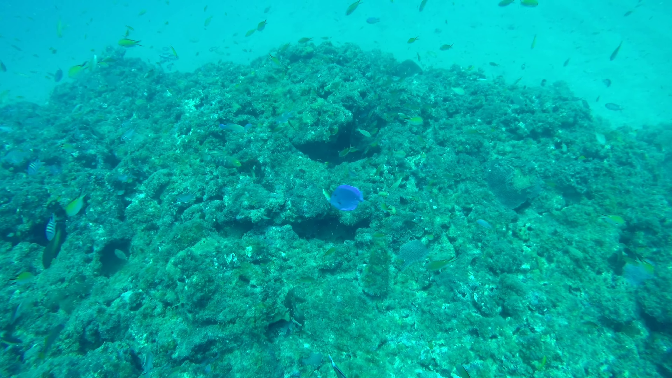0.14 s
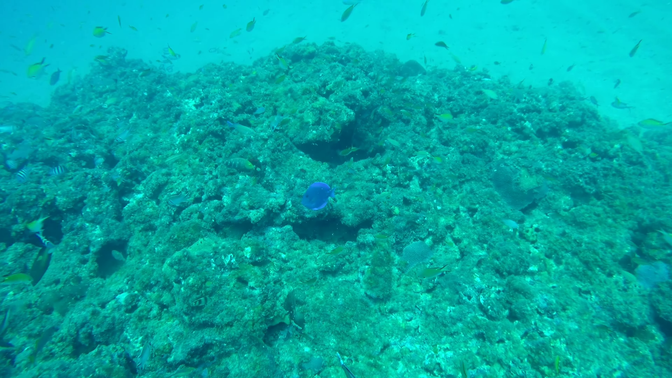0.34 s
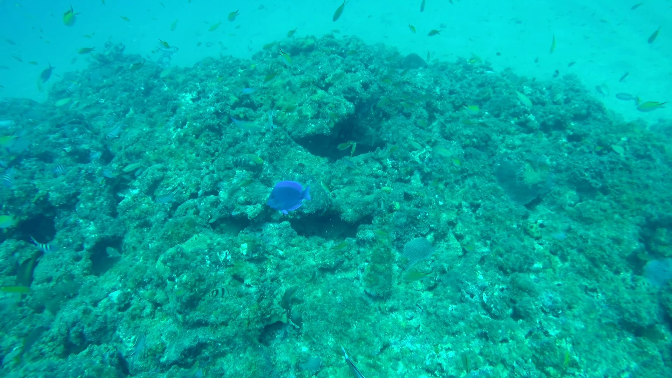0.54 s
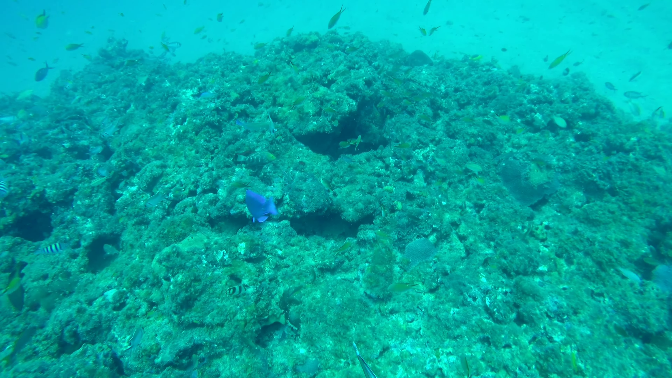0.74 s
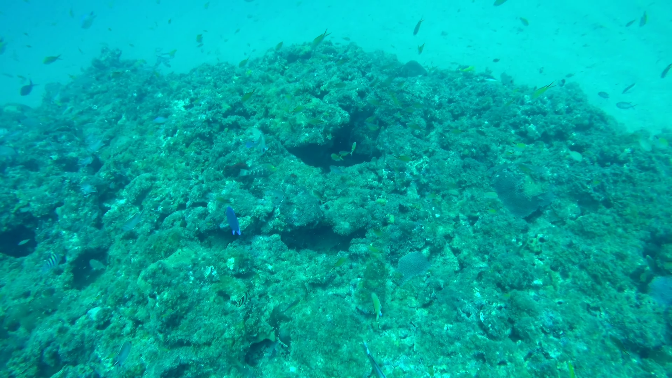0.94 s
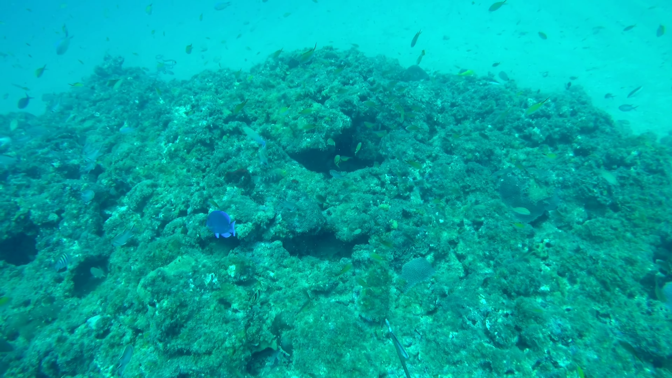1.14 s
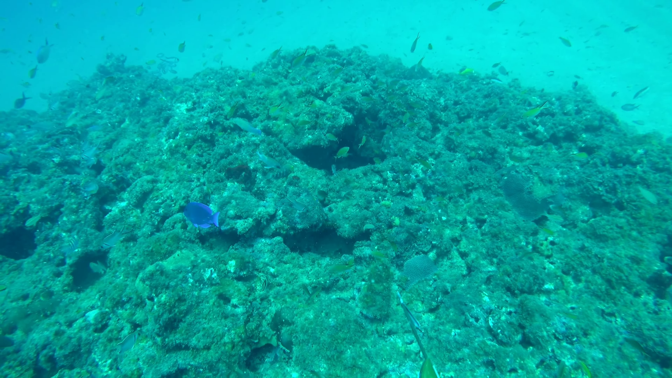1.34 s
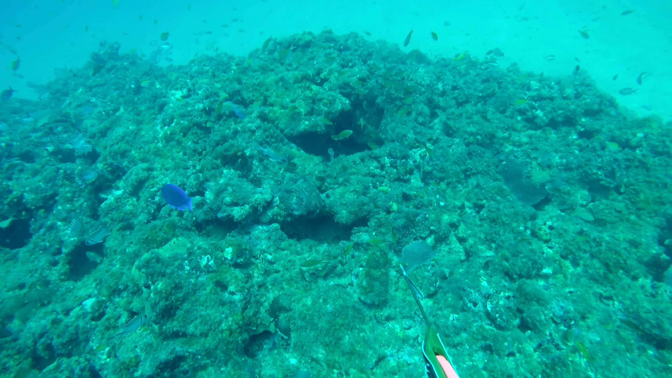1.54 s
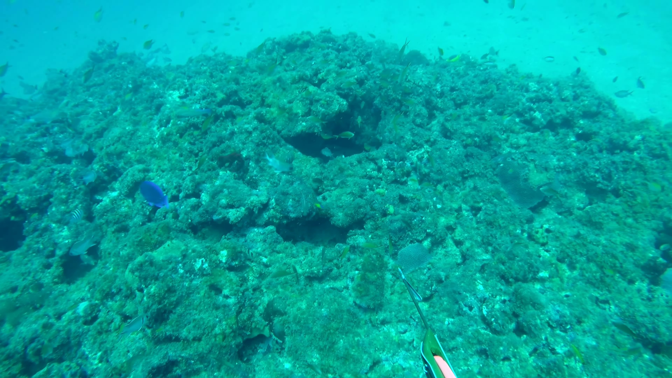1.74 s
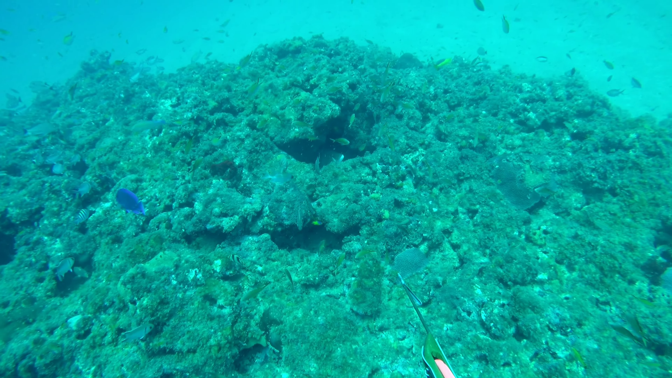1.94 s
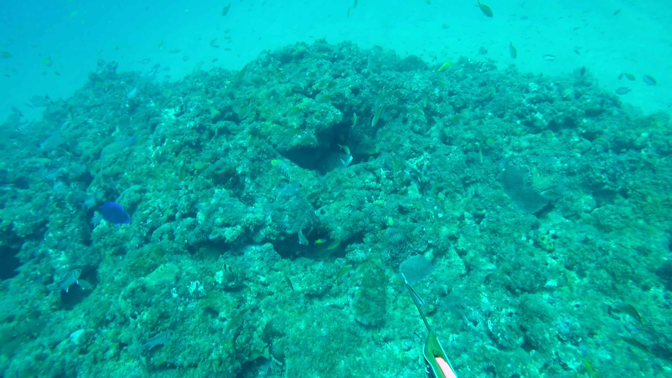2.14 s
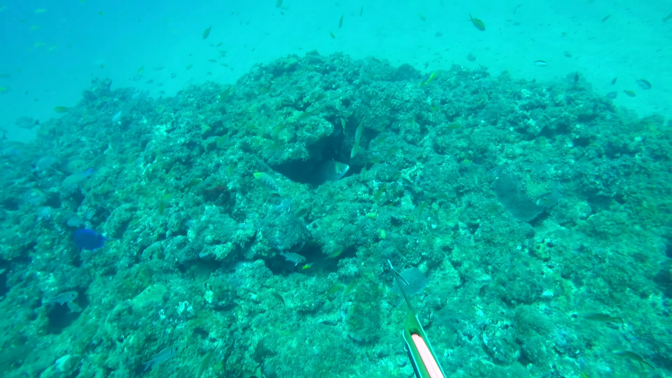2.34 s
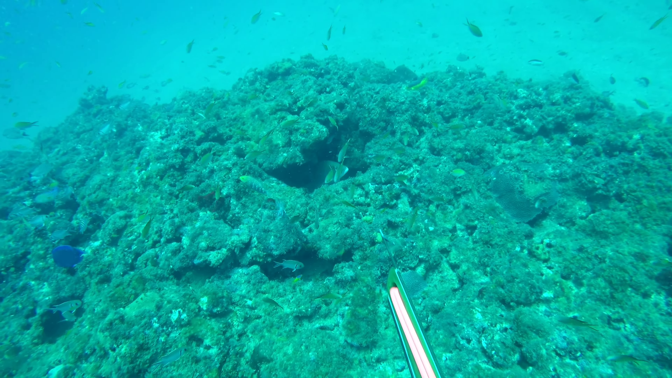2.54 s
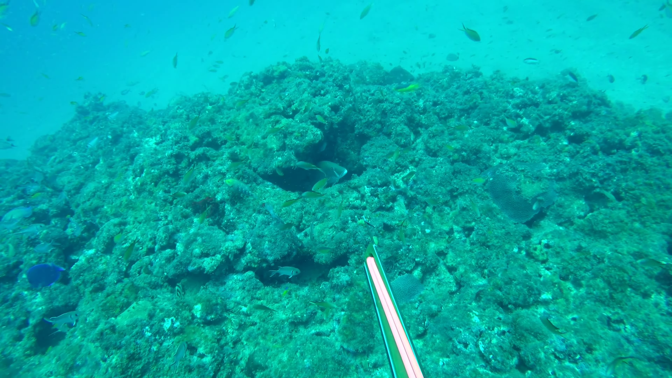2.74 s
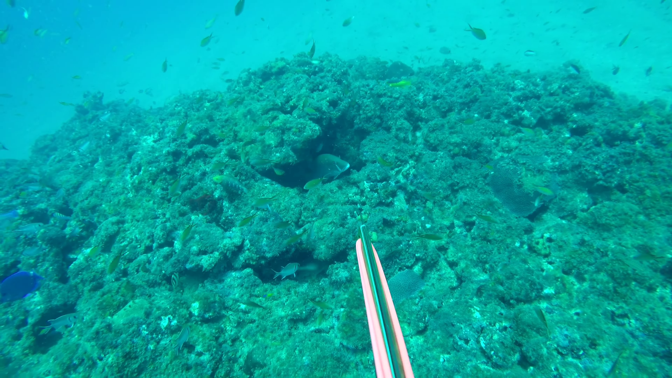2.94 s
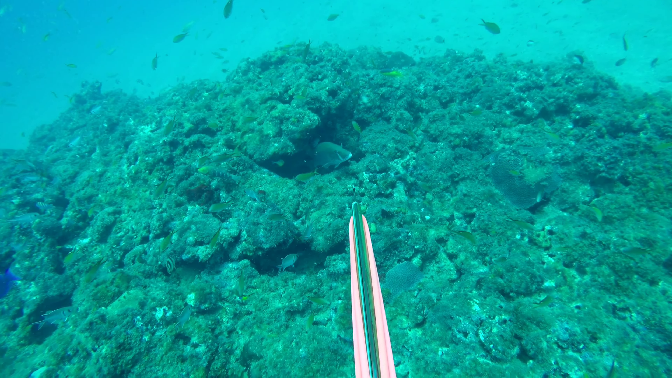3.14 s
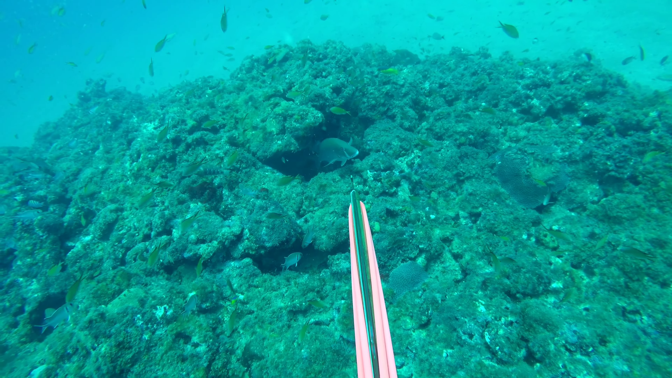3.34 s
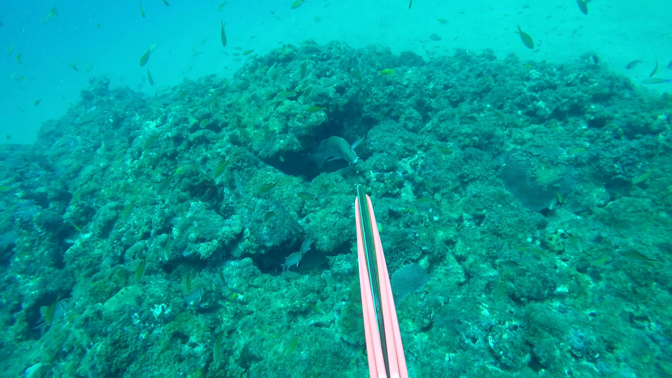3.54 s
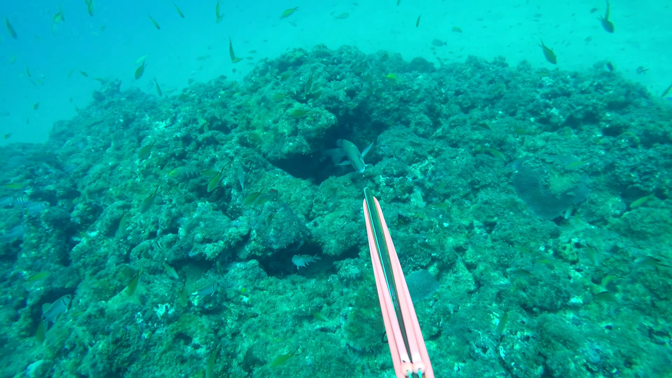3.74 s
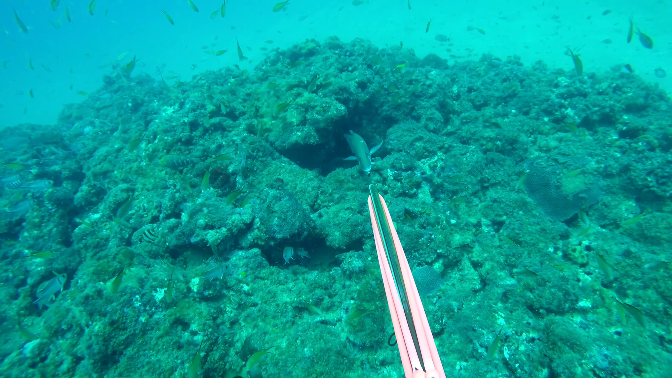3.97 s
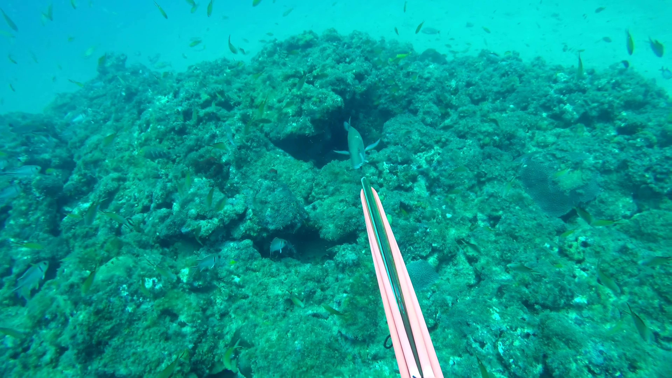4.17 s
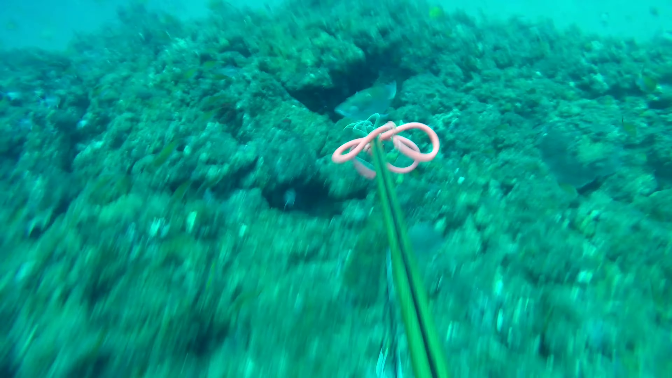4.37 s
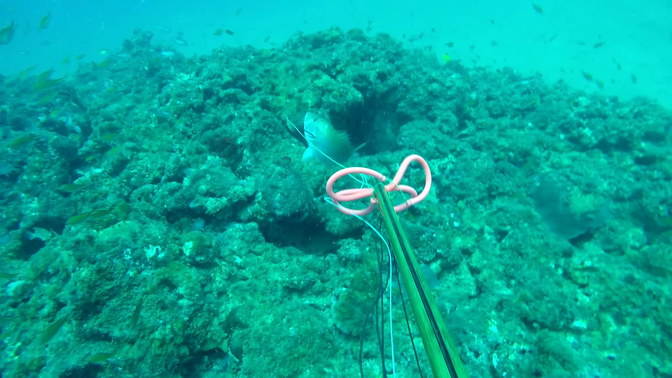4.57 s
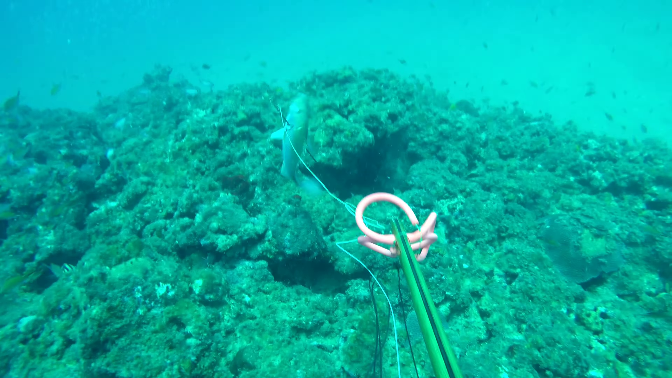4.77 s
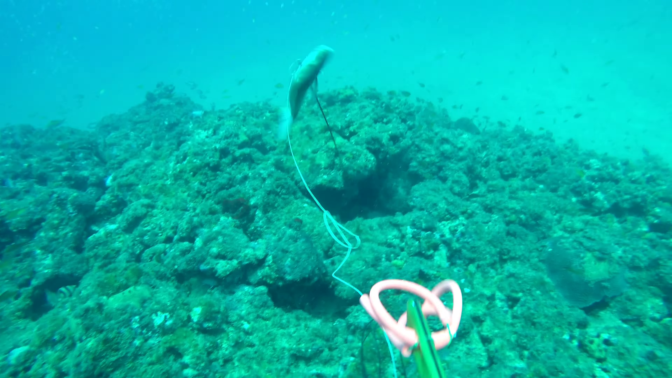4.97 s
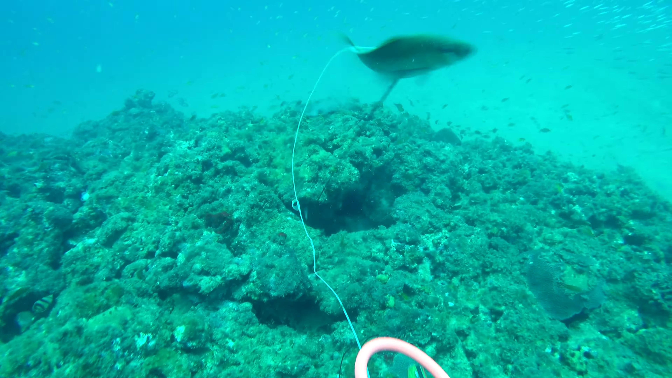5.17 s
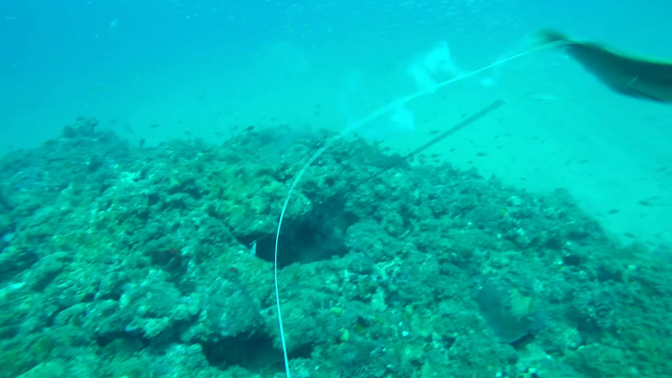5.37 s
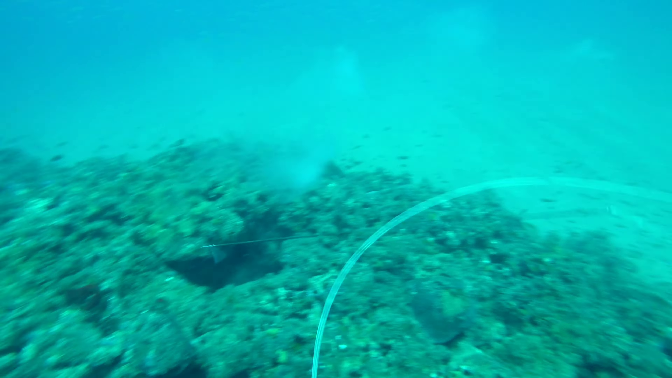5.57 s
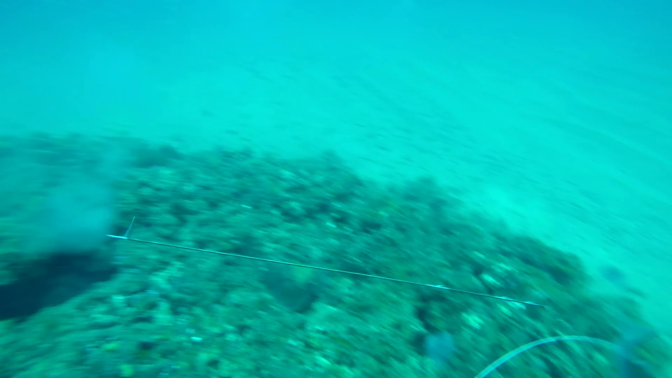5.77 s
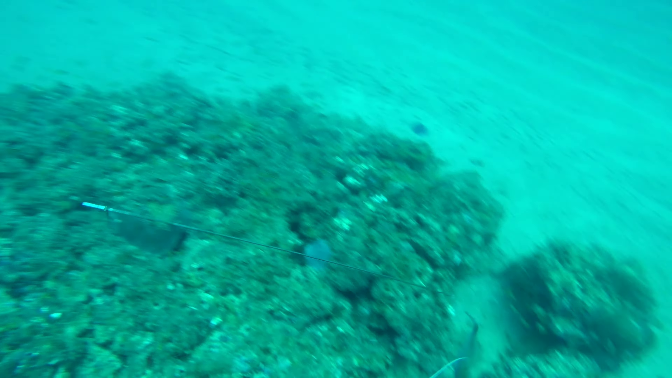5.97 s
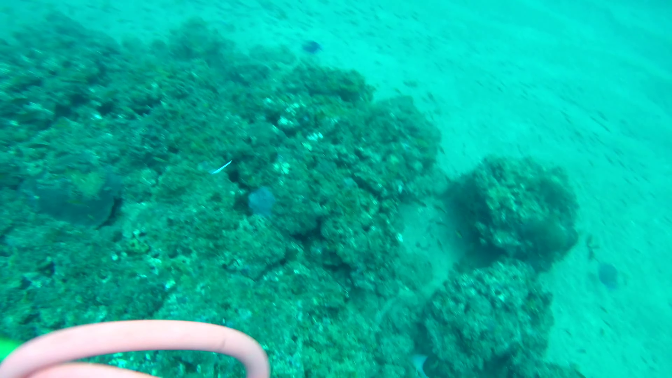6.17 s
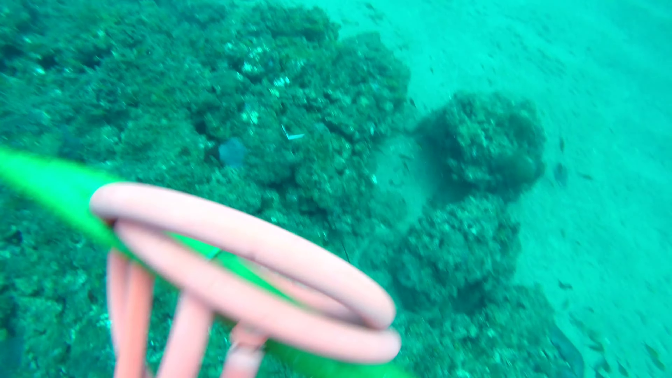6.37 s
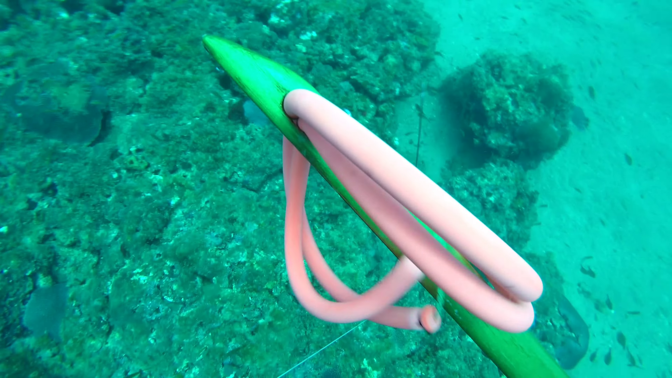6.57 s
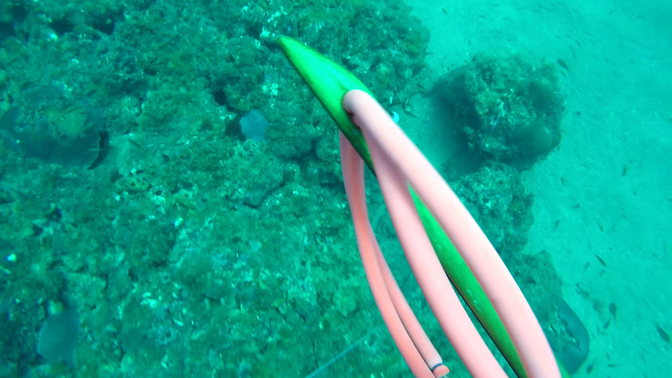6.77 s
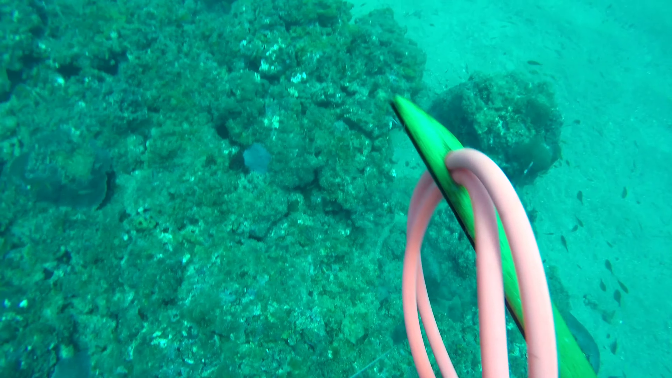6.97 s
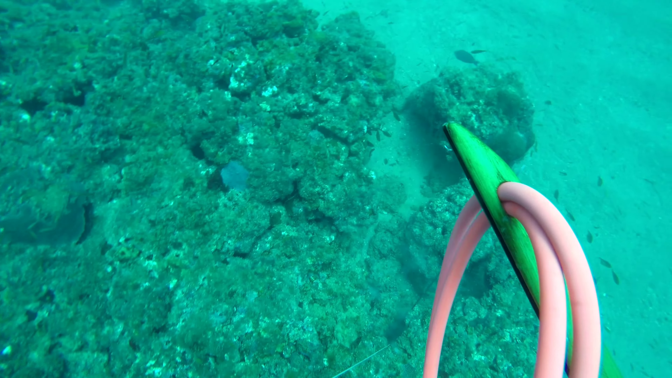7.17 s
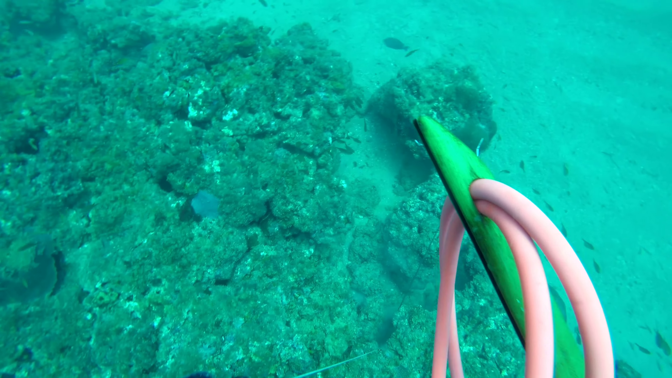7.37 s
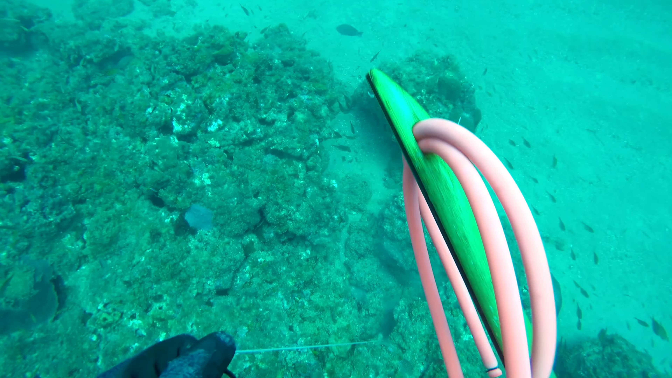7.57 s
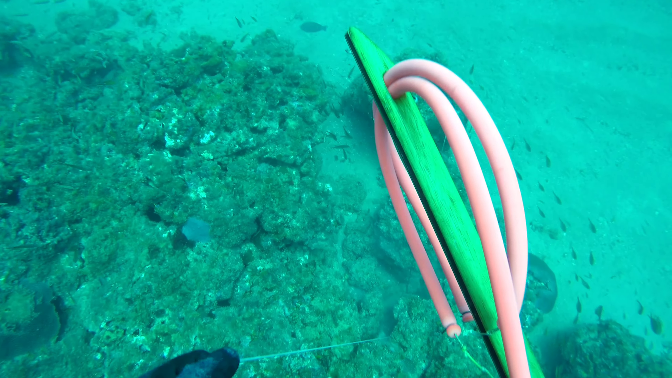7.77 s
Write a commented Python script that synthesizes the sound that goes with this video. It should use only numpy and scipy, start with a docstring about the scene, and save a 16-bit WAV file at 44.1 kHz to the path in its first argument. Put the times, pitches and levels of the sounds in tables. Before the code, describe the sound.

Quiet submerged hiss and steady ticking are broken by a loud speargun shot, followed by gurgling water, rubber rubs, clunks and small bubbles.

```python
"""Over a reef, from a cased camera on a diver's head: crackling water hiss, low surge and a steady
far ticking, likely a boat engine, with dull thumps of the case and a few near shrimp snaps.
Past four seconds a band-powered speargun fires close by and bubbles hiss; gun, rubber bands and line
knock, ping and rub while water rumbles past the case, and later the gear lets go of bubbles.
Ticks and hiss ring in the modes of the plastic case, knocks and rubbing in those of the gun."""
import sys
import numpy as np
from scipy import signal
from scipy.io import wavfile

SR = 44100
rng = np.random.default_rng(int(sys.argv[2]) if len(sys.argv) > 2 else 0)


def pcm_store(signal):
    """Save signal as 16-bit PCM."""
    levels = np.round(np.clip(np.atleast_2d(signal), -1, 1) * 32767)
    wavfile.write(sys.argv[1], SR, levels.astype(np.int16).T)


N = 344414  # length [samples]


def amp(db):
    """Decibels to gain."""
    return 10 ** (np.asarray(db) / 20)


def rms_one(x):
    """Scale to unit rms."""
    return x / np.sqrt(np.mean(x ** 2) + 1e-20)


def butter(x, hz, kind, order=2):
    """Butterworth filter."""
    return signal.sosfilt(signal.butter(order, hz, kind, fs=SR, output="sos"), x)


def drift(hz):
    """Random wander of unit rms, slower than hz."""
    return rms_one(butter(rng.standard_normal(N + SR), hz, "low")[SR:])


def add(out, s, sound):
    """Mix a short sound in at time s."""
    at = max(round(s * SR), 0)
    out[at:at + len(sound)] += sound[:N - at]


def burst(t60, rise_s):
    """A puff of noise that swells quickly and dies away."""
    t = np.arange(round(.12 * SR)) / SR
    swell = 1 - np.exp(-t / rise_s)
    return rng.standard_normal(len(t)) * swell * amp(-60 * t / max(t60, .004))


def grains(per_s, spread_db):
    """Random clicks of very uneven size; rms 1."""
    sizes = amp(spread_db * np.minimum(rng.exponential(1, N), 4)) * rng.choice([-1, 1], N)
    return rms_one(sizes * (rng.random(N) < per_s / SR))


def modes(x, table, spread_db=0):
    """Parallel two-pole resonances, their gains scattered at random by spread_db."""
    out = 0
    for hz, width, db in table:
        r = np.exp(-np.pi * width / SR)
        gain = amp(db + spread_db * rng.standard_normal()) * (1 - r * r) / 2
        poles = [1, -2 * r * np.cos(2 * np.pi * hz / SR), r * r]
        out = out + signal.lfilter([gain, 0, -gain], poles, x + 1e-18)
    return out


def in_time(rows, t):
    """Columns of a curve, read at times t."""
    s, *columns = np.transpose(rows)
    return [np.interp(t, s, c) for c in columns]


# modes of the plastic case round the microphone: (frequency [Hz], width [Hz], relative level [dB])
CASE_MODES = [(717, 33, 3.5), (935, 262, 7.5), (1210, 43, 5.5), (1828, 235, 7), (2500, 290, -5),
              (3370, 450, 2), (4470, 190, -23.5), (6470, 730, -27.5)]
# dead spots between the modes: (frequency [Hz], width [Hz])
CASE_DEAD_SPOTS = [(1570, 93), (2950, 610), (4200, 110)]


def case(x):
    """Waterborne sound rings in the case modes, then thins at the dead spots between them."""
    out = modes(x, CASE_MODES)
    for hz, width in CASE_DEAD_SPOTS:
        # part of the sound passes each dead spot untouched
        out = 0.24 * out + 0.72 * signal.lfilter(*signal.iirnotch(hz, hz / width, SR), out)
    return out


def reef_hiss():
    """The reef crackles finely, in clumps: a mass of tiny clicks heard through the case."""
    hiss_db = -59 + 2.8 * drift(25)
    crackle = butter(grains(3000, 5.25), 1327, "low", order=1)
    return amp(hiss_db) * rms_one(case(crackle))


def self_noise():
    """The microphone's own steady noise, with a faint narrow hiss high up."""
    noise = butter(butter(rng.standard_normal(N), 170, "high"), 2370, "low", order=1)
    high_hiss = butter(rng.standard_normal(N), [10800, 11300], "band")
    return amp(-64) * rms_one(noise) + amp(-82.5) * rms_one(high_hiss)


# water stirred by the diver's moves, at the case: (time [s], relative level [dB])
MOTION = [(0, -54.5), (.38, -89), (.43, -51), (.59, -48), (.7, -67.5), (4.22, -74), (4.27, -27),
          (4.46, -39.5), (4.6, -44), (4.85, -40), (5.15, -33.5), (5.45, -38.5), (5.8, -46.5), (5.88, -39),
          (6.2, -40), (6.4, -33), (6.9, -41.5), (7.26, -41.5), (7.32, -52.5), (7.45, -43), (7.81, -54.5)]


def stirred_water_db():
    """Level of the stirred water, following the diver's moves."""
    motion_db, = in_time(MOTION, np.arange(N) / SR)
    return motion_db


def surge(motion_db):
    """Low pressure swings push the membrane directly, in calm water and more while moving."""
    calm_db, moving_over_motion_db = -50.5, 2
    swings = butter(butter(rng.standard_normal(N), 36.0, "low"), 14, "high")
    swings = rms_one(swings) * amp(2.0 * drift(20.0))
    return swings * np.hypot(amp(calm_db), amp(motion_db + moving_over_motion_db))


def gurgle():
    """Trapped water slops: random pushes dealt to low rings of ten cycles; rms 1."""
    pushes, dealt, out = grains(300, 4.87), rng.integers(0, 10, N), 0
    for k, hz in enumerate(np.geomspace(80, 330, 10)):
        r, w = amp(-60 * hz / 10.0 / SR), 2 * np.pi * hz / SR
        push = pushes * (dealt == k) + 1e-18
        out = out + signal.lfilter([np.sin(w)], [1, -2 * r * np.cos(w), r * r], push)
    low = butter(out, 285, "low", order=6) + 0.057 * butter(out, 770, "low")
    return rms_one(butter(low, 140, "high"))


def rumble(motion_db):
    """Gurgling water pushes the membrane directly, as strongly as the diver stirs it."""
    return gurgle() * amp(motion_db + 3.04 * drift(20.0))


def bubble_wash(motion_db):
    """Fine bubbles in the stirred water wash against the case as a mass of small clicks."""
    clicks = rms_one(butter(grains(600, 4.14), [300, 1000], "band"))
    wash_over_motion_db = -16.5
    return clicks * amp(motion_db + wash_over_motion_db + 3.5 * drift(20))


# the far engine hunts around its mean speed:
# (time [s], lag behind the even beat [ms], relative level [dB])
ENGINE = [(0, 5.5, -36.5), (0.55, -2, -36), (0.96, 4.5, -35.5), (1.3, -2.5, -37), (1.71, -5, -39),
          (1.96, 5, -36), (2.36, -3.5, -40), (2.46, 2, -36.5), (2.79, 5, -35.5), (3.2, -3, -35),
          (3.53, -9, -36), (3.83, 7.5, -36), (3.97, 11.5, -37.5), (4.2, -6.5, -42), (5.2, 5.5, -49.5),
          (5.75, 6.5, -32.5), (6.15, 6, -48), (7.81, 11.5, -40)]
# its cylinders in firing order: (relative level [dB])
CYLINDERS = [-10.5, -1, -2, -3.5]
FIRINGS_PER_S, FIRST_EVEN_BEAT_S, FIRING_SCATTER_DB = 24.075, 0.008, 1.6


def ticks():
    """Each firing is a sharp click with a little puff; distance leaves a band around one ring."""
    out = np.zeros(N)
    even = np.arange(FIRST_EVEN_BEAT_S, N / SR - .02, 1 / FIRINGS_PER_S)
    lag_ms, level_db = in_time(ENGINE, even)
    level_db = level_db + np.resize(CYLINDERS, len(even))
    level_db = level_db + FIRING_SCATTER_DB * rng.standard_normal(len(even))
    for s, db in zip(even + lag_ms / 1000, level_db):
        puff = 0.5 * burst(0.025, 0.00023)
        puff[0] = 4.4  # the click
        add(out, s, amp(db + 10.0) * puff)
    out = butter(out, [1500, 5300], "band", order=4) * 0.62 + 0.66 * butter(out, [700, 1300], "band")
    ring = 2.33 * butter(out, [2100, 2700], "band")
    return out + ring + 0.22 * butter(out, [4500, 5100], "band", order=1)


# dull thumps on the case, and one short bubble blip at 4.74 s:
# (time [s], relative level [dB], ring [Hz])
THUMPS = [(0.318, -39, 113), (0.422, -36, 206), (0.504, -36, 197), (0.534, -42, 300), (3.742, -32.5, 153),
          (4.045, -29, 166), (4.257, -10, 72), (4.287, -8, 94.4), (4.336, -14.5, 194), (4.365, -1.5, 189),
          (4.424, -14, 42.3), (4.657, -12, 162), (4.665, -8, 135), (4.74, -23.5, 790), (4.799, -14.5, 196),
          (4.815, -18.5, 137), (4.976, -25.5, 242), (5.008, -25.5, 145), (5.086, -20, 120),
          (5.102, -19.5, 178), (6.245, -22, 81.5), (6.348, -21.5, 210), (6.387, -9, 217), (6.409, -18, 32),
          (6.469, -24, 195), (6.491, -24.5, 200), (6.681, -35, 190), (6.786, -24, 204), (6.827, -19, 120.7),
          (7.005, -25.5, 97), (7.405, -23, 200), (7.425, -21.5, 188), (7.478, -23.5, 166), (7.49, -31, 28)]


def thumps():
    """The case rocks on its strap (one row is a bubble blip): a few cycles swell and die, low ones longer."""
    out, t = np.zeros(N), np.arange(round(.2 * SR)) / SR
    for s, db, hz in THUMPS:
        swell = (1 - np.exp(-t * hz / 0.58)) * amp(-60 * t * (hz + 60) / 8.76)
        thump = butter(swell * np.sin(2 * np.pi * hz * t), 3.4 * hz, "low")
        add(out, s, amp(db + 11.0) * thump)
    return out


# shrimp snaps near the microphone: (time [s], relative level [dB])
SNAPS = [(0.608, -47), (0.6984, -40), (2.2197, -35), (3.767, -37.5)]


def snaps():
    """A near shrimp gives a bare bright crack: a very short puff of high noise."""
    out = np.zeros(N)
    for s, db in SNAPS:
        add(out, s - .0005, amp(db + 8) * burst(0.0021, 0.0003))
    return butter(out, [4500, 13000], "band")


# shot and knocks of gun and line, close by:
# (time [s], relative level [dB], treble against the body [dB])
KNOCKS = [(4.045, -22, -50), (4.059, -25, -58), (4.26, 0, -19), (4.264, 1.5, -1.5), (4.268, 2, 0),
          (4.279, -12, -8), (4.284, -7, -1), (4.288, -0.5, -13.5), (4.292, -1.5, -11.5), (4.315, -19, -9),
          (4.332, -3, -13), (4.356, -20, -5), (4.361, -11, -19.5), (4.47, -37.5, -11), (4.501, -26, -17.5),
          (4.513, -18, -13.5), (4.594, -42, 7), (4.654, -18, -23), (4.739, -25, -10), (4.753, -42, -15),
          (4.787, -14, -26.5), (4.817, -54, 9.5), (4.976, -27.5, -27.5), (4.992, -29.5, -19),
          (5.086, -33, -11), (5.101, -27, -27.5), (5.907, -30, -21), (5.963, -24.5, -8), (6.02, -33, -16),
          (6.09, -32, -4.5), (6.255, -34.5, -33.5), (6.262, -43, 10.5), (6.282, -30, 2), (6.327, -36, -9.5),
          (6.34, -27, -19), (6.371, -21.5, -6), (6.385, -9.5, -15), (6.505, -35, -12.5), (6.552, -29, -25),
          (6.58, -32, 4.5), (6.687, -31, -12.5), (6.782, -27.5, -23.5), (6.789, -30, -10),
          (6.813, -31.5, -15.5), (6.886, -32, -10), (6.936, -36.5, -14), (7.104, -30, -14.5),
          (7.114, -30.5, -13.5), (7.127, -33, -9), (7.138, -25, -23.5), (7.157, -30, -19.5),
          (7.176, -33, -22), (7.208, -23.5, -16.5), (7.225, -22, -19), (7.258, -27, -17.5),
          (7.273, -39, -19), (7.286, -38.5, -14), (7.359, -24.5, -26.5), (7.375, -41.5, 8.5),
          (7.405, -29.5, -16), (7.423, -18.5, -12.5), (7.473, -19.5, -13)]
# modes of the gun, heard in knocks and rubbing: (frequency [Hz], width [Hz], relative level [dB])
GUN_MODES = [(686, 780, -1.5), (904, 600, 2.5), (1210, 150, -4), (1775, 700, -1.5), (1914, 220, -3),
             (2700, 310, -8), (3430, 550, -4.5), (5386, 1300, -26.5), (6850, 600, -18.5),
             (12740, 2900, -24)]
# softer knocks last longer: t60 at 0 dB treble, dB of length gained per dB of treble lost, longest t60
HARD_T60_S, SOFT_STRETCH, LONGEST_T60_S = 0.023, 0.43, 0.08
# every knock opens with a crack: its t60, and its level over the puff
CRACK_T60_S, CRACK_DB = 0.009, 8.0
# the gun's frame rings on after a knock: share of the mode widths, and level
RING_WIDTH, RING_DB = 0.13, 10.5


def knocks():
    """Contacts crack and puff: hard ones thin and bright, with treble dying sooner, soft ones long and dull."""
    out = np.zeros(N)
    frame_modes = np.multiply(GUN_MODES[:6], [1, RING_WIDTH, 1])
    for s, db, treble_db in KNOCKS:
        t60 = min(HARD_T60_S * amp(-SOFT_STRETCH * treble_db), LONGEST_T60_S)
        hit = burst(t60, 0.00063) + amp(CRACK_DB) * burst(CRACK_T60_S, 0.00044)
        # more treble opens the top of the body and thins its bottom
        top_hz = np.clip(4500 * amp(0.74 * (treble_db + 13.5)), 950, 7000)
        bottom_hz = np.clip(1100 * amp(1.6 * (treble_db + 13.0)), 150, 2500)
        hit = butter(butter(hit, top_hz, "low", order=3), bottom_hz, "high", order=1)
        body = modes(hit, GUN_MODES, spread_db=2.0)
        body = body + amp(RING_DB) * modes(hit, frame_modes, spread_db=1.0)
        treble = butter(burst(0.4 * t60, 0.0018), [3300, 10000], "band")
        treble = modes(treble, GUN_MODES[-4:], spread_db=4.0)
        knock = body / np.abs(body).max() + amp(treble_db) * treble / np.abs(treble).max()
        add(out, s - .001, amp(db) * knock)
    return out


# small metal parts ping close by: (time [s], relative level [dB])
PINGS = [(4.049, -42.5), (4.531, -46), (4.861, -50), (5.11, -49)]
# modes of those parts: (frequency [Hz], relative level [dB], t60 [s])
PING_MODES = [(2823, -2.5, 0.16), (4600, -19, .05), (7350, -25, 0.039)]


def pings():
    """Small metal parts start a little flat and settle on their modes as they ring out."""
    out, t = np.zeros(N), np.arange(round(.15 * SR)) / SR
    settling = t + 0.00146 * np.exp(-t / 0.025)
    for s, db in PINGS:
        for hz, level_db, t60 in PING_MODES:
            fade = amp(db + level_db - 60 * t / t60)
            add(out, s, fade * np.sin(2 * np.pi * hz * settling))
    return out


# rubber and line rub in strokes, close by; the first row is bubble hiss after the shot:
# (start [s], end [s], relative level [dB], fizz against the slips [dB])
STROKES = [(4.294, 4.4, -50, -14.5), (4.393, 4.582, -54, -22), (4.639, 4.775, -52.5, -15),
           (4.8, 4.89, -52, -17), (4.954, 5.166, -56, -18.5), (5.204, 5.444, -56.5, -20.5),
           (5.78, 6.23, -57.5, -17.5), (6.265, 6.455, -49.5, -14.5), (6.432, 6.604, -48, -15.5),
           (6.6, 6.707, -50, -10.5), (6.724, 6.854, -48.5, -19.5), (6.87, 6.972, -49, -11),
           (7.078, 7.207, -44.5, -23), (7.213, 7.301, -45, -30), (7.392, 7.46, -46, -27)]


def rubbing():
    """Uneven slips ring in the gun under a fine fizz, in strokes; the first stands for bubble hiss."""
    t = np.arange(N) / SR
    slips = butter(grains(700, 4.0) * amp(3.5 * drift(60)), [700, 4300], "band", order=4)
    slips = rms_one(modes(slips, GUN_MODES))
    slips = slips + 0.7 * butter(slips, [850, 1330], "band")
    fizz = grains(9000, 3.5) * amp(3.5 * drift(30))
    fizz = butter(fizz, [4700, 8100], "band", order=3) + 0.38 * butter(fizz, [11600, 13600], "band")
    fizz = rms_one(fizz)
    out = np.zeros(N)
    for start, end, db, fizz_db in STROKES:
        stroke = np.clip(np.minimum(t - start, end - t) / 0.011, 0, 1)  # 11 ms ramps
        out += amp(db) * stroke * (slips + amp(fizz_db) * fizz)
    return out


# bubbles let go by the gear, close by: (time [s], relative level [dB], starting pitch [Hz])
BUBBLES = [(5.41, -32, 298), (5.69, -44, 488), (5.715, -41.5, 624), (5.75, -40.5, 746), (5.805, -40.5, 658)]


def bubbles():
    """Each bubble rings as a single tone that rises in pitch as it fades."""
    out, t = np.zeros(N), np.arange(round(.15 * SR)) / SR
    for s, db, hz in BUBBLES:
        fade = amp(db - 60 * t / 0.12) * (1 - np.exp(-t / 0.00045))
        add(out, s, fade * np.sin(2 * np.pi * hz * (t + 3.5 * t * t)))
    return out


def scene():
    """Water and reef, far engine and close gear summed at the one microphone in the case."""
    motion_db = stirred_water_db()
    water = surge(motion_db) + rumble(motion_db) + bubble_wash(motion_db)
    background = reef_hiss() + self_noise() + case(ticks())
    contacts = knocks() + rubbing()
    # knocks and rubbing share three dead spots of the gun
    for hz in (1400, 3080, 4500):
        contacts = signal.lfilter(*signal.iirnotch(hz, 11.0, SR), contacts)
    return (background + water + thumps() + snaps() + contacts + pings() + bubbles())[None]


def record(dry):
    """Peaks flatten near full scale, and the top is cut by 60 dB from 16.5 kHz up."""
    flattened = 1.05 * np.tanh(dry / 1.05)
    return signal.sosfilt(signal.cheby2(10, 60, 16500, fs=SR, output="sos"), flattened)


dry = scene()
out = record(dry)
pcm_store(out)
```